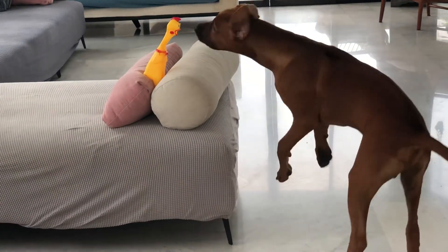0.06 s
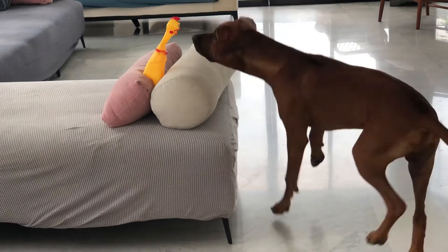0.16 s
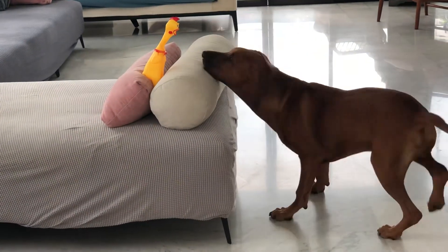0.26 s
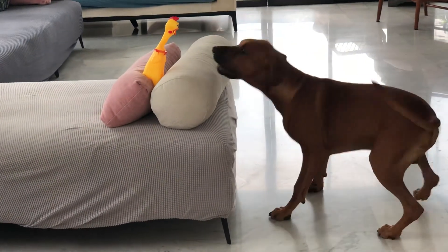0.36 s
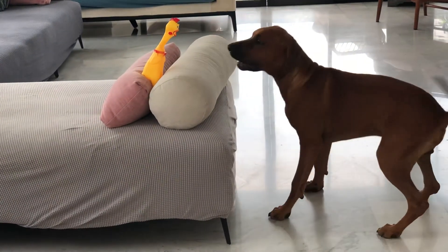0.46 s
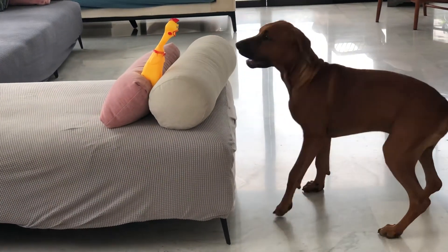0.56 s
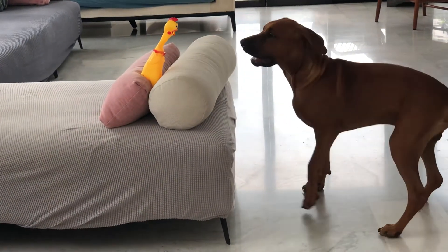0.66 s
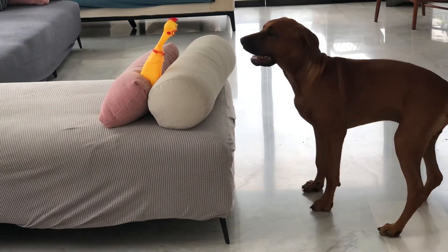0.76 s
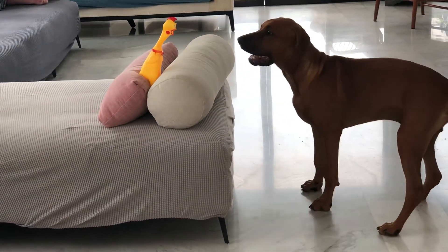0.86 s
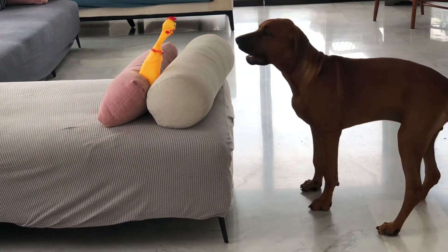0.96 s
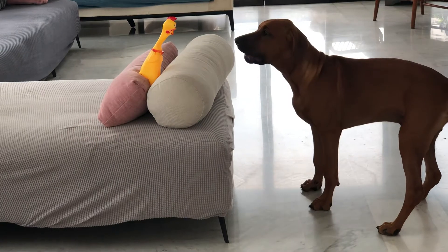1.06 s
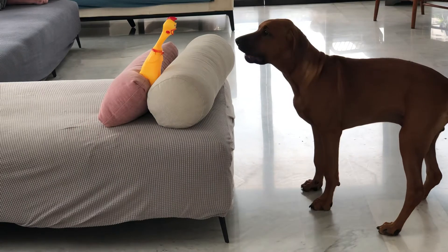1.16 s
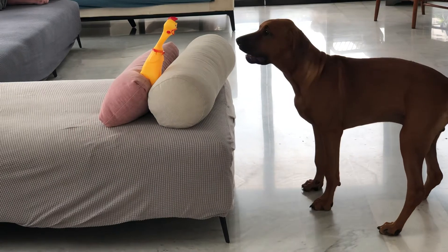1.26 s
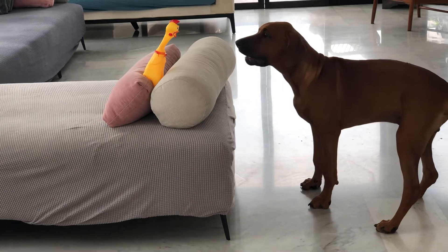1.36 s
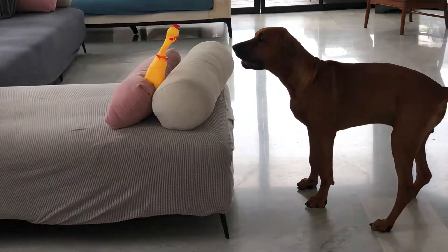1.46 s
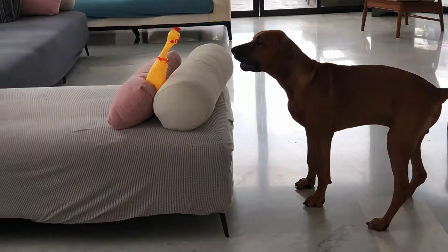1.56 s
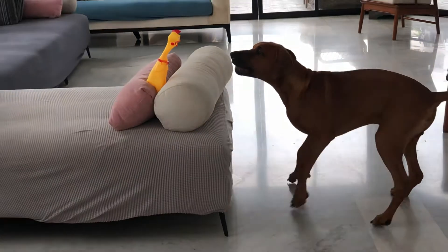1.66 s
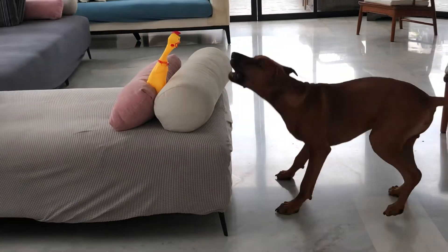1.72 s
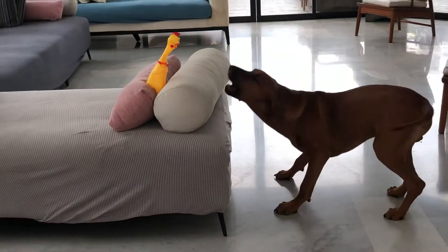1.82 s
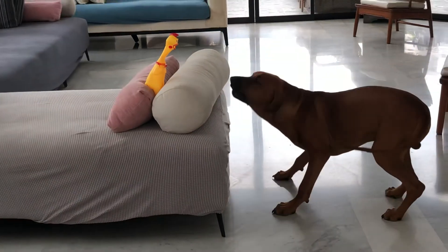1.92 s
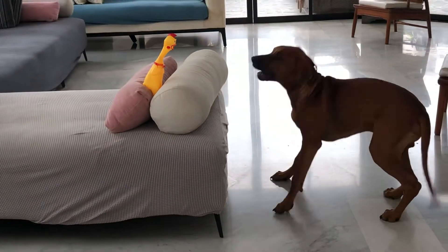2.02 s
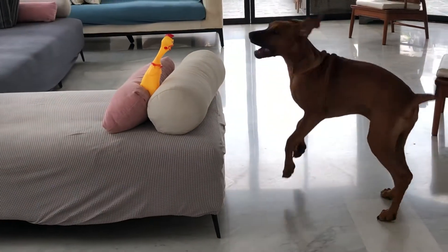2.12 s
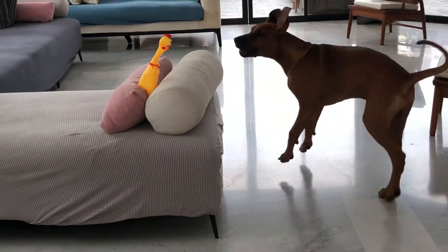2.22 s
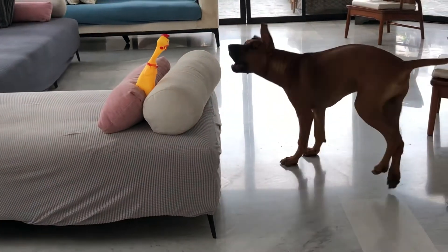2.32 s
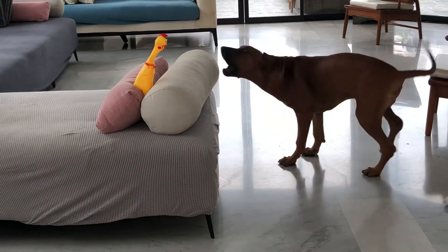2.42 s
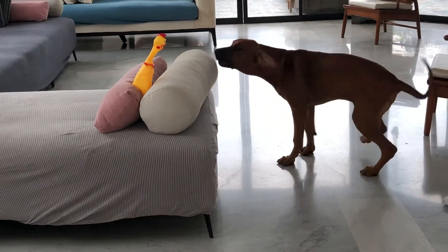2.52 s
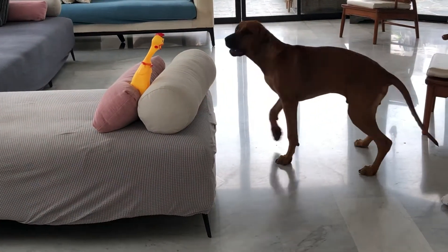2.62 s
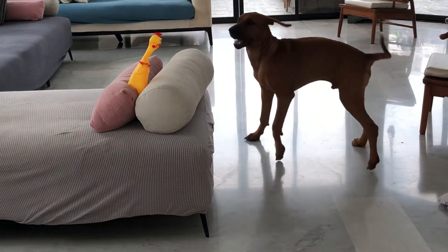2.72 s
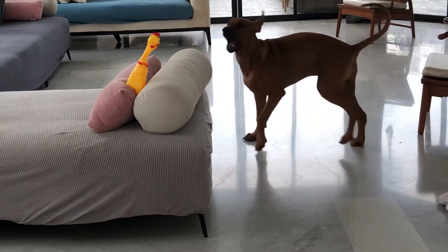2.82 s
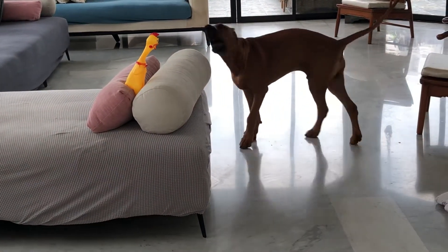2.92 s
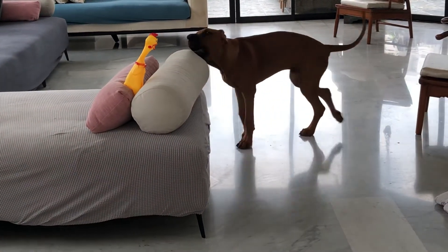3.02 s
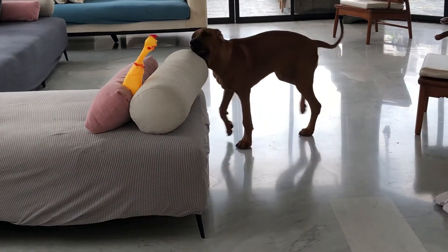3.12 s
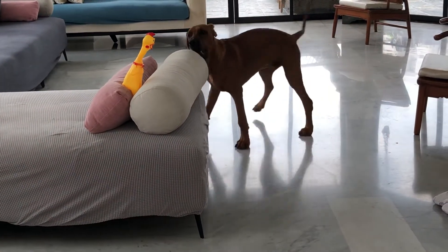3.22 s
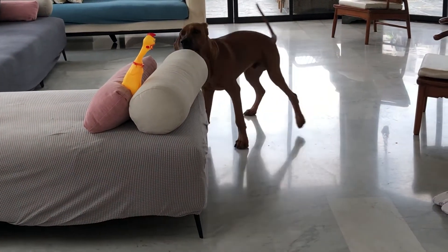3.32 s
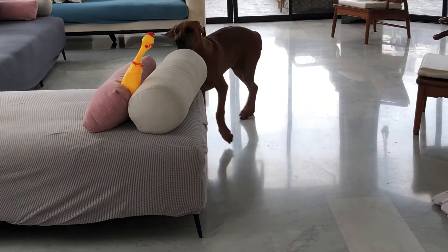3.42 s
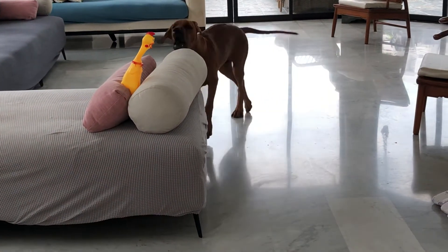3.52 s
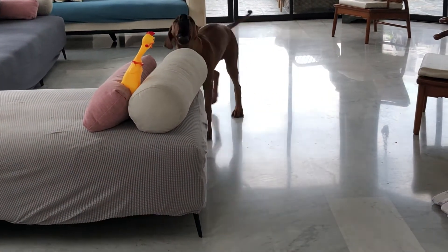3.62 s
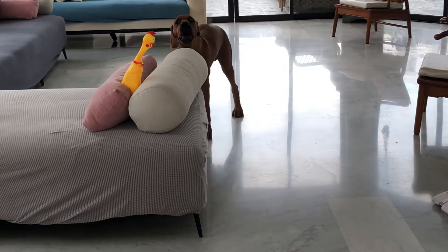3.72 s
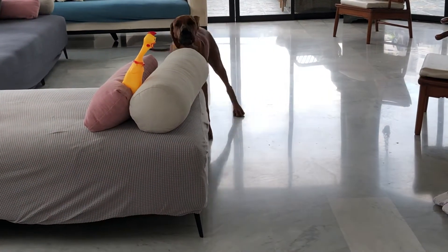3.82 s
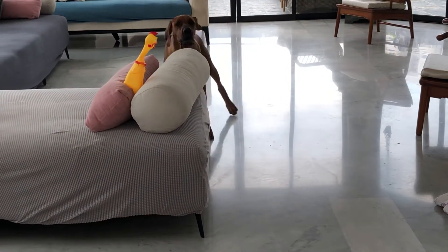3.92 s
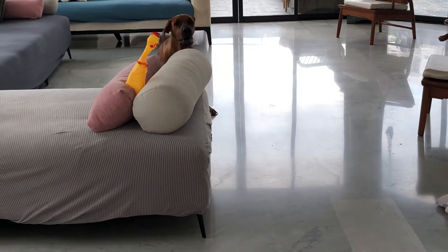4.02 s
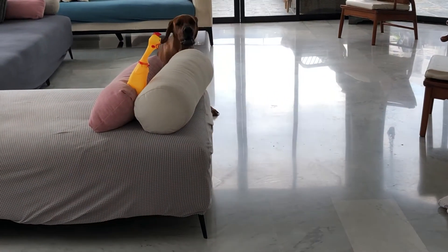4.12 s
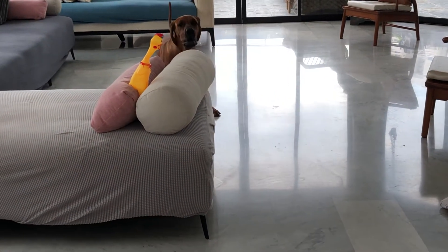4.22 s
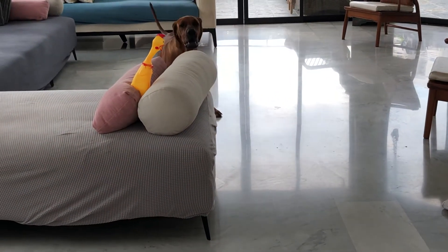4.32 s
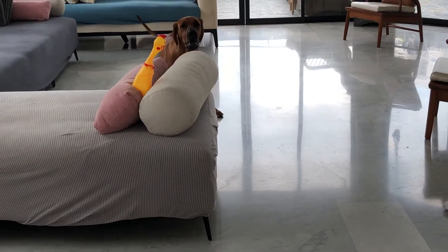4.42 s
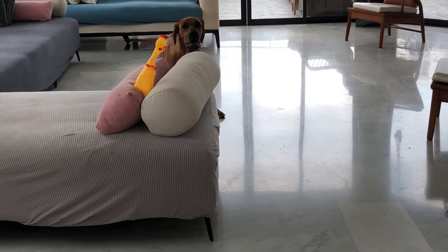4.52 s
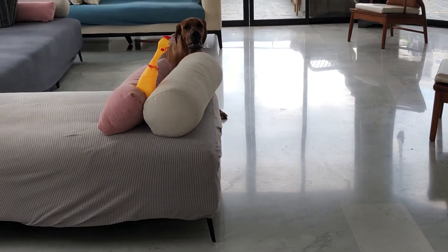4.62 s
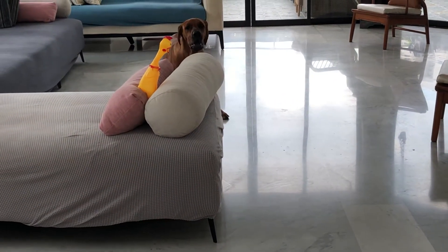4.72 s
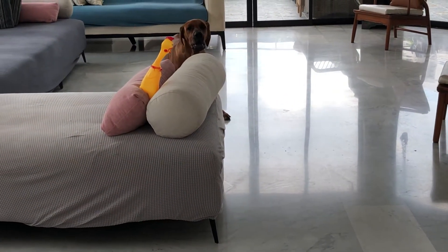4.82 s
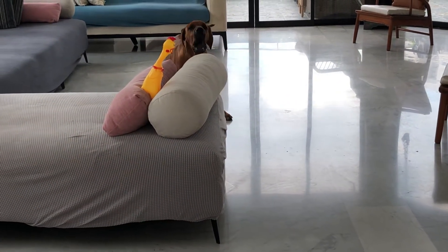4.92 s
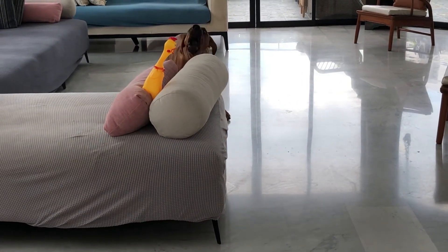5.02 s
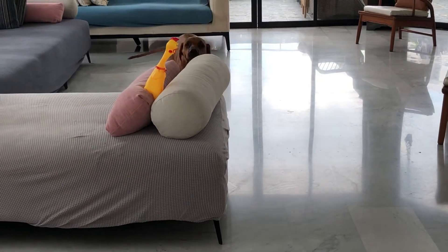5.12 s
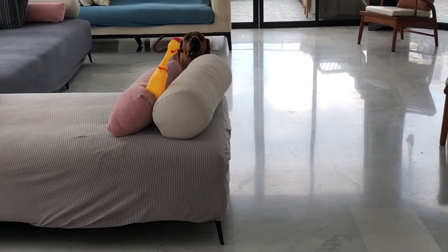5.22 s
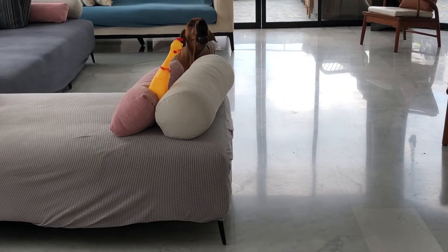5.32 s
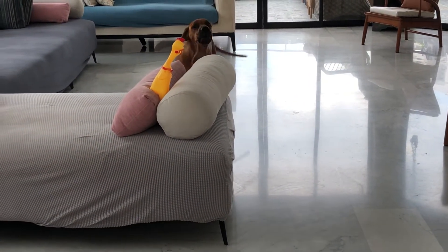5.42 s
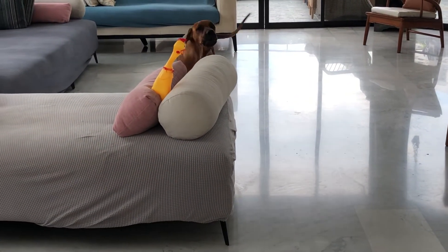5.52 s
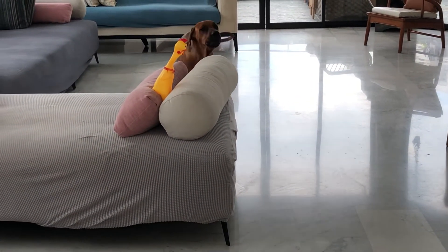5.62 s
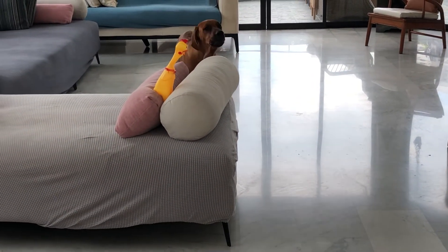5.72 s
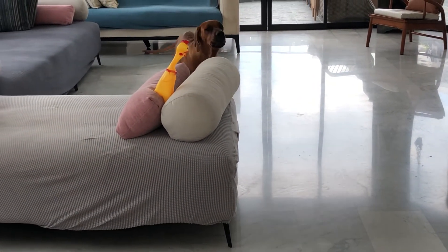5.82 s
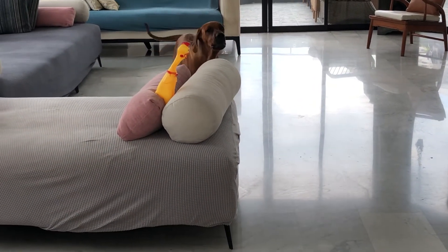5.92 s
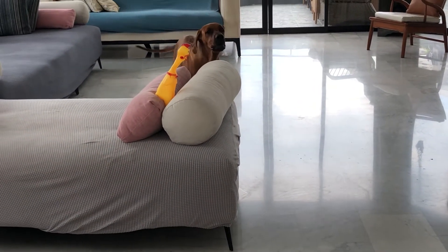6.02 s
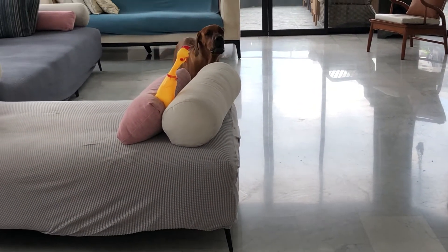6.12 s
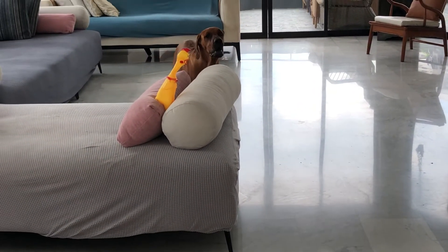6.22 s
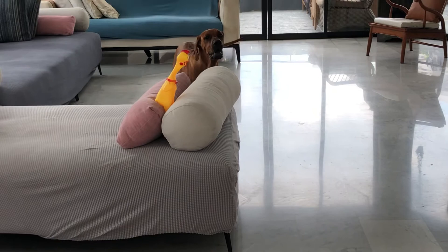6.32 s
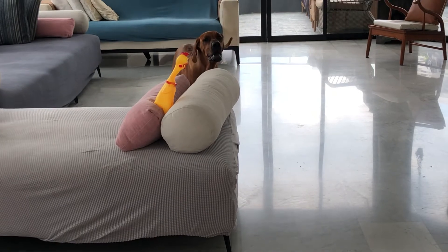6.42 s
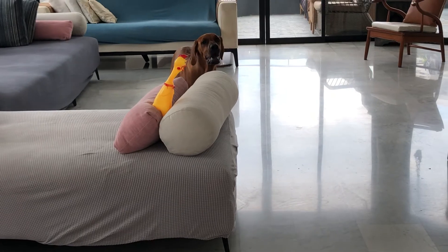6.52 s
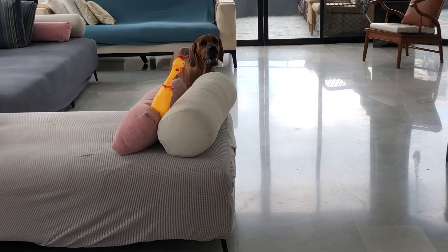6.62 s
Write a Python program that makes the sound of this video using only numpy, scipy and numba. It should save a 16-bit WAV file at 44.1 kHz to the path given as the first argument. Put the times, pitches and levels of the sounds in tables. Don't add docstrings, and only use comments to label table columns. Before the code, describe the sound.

In a quiet, hard-floored living room, claws tick and pads scuff softly on stone, and a far chair leg gives one brief squeak. Then a large dog barks four single, spaced barks, pauses about a second, and adds two in quick succession, the last weaker and rougher. Each bark rings for about a second. A phone a few metres away squeezes the loud peaks over low room hum and street noise.

```python
import sys
import numpy as np
from scipy import signal
from scipy.fft import rfft, irfft
from scipy.io import wavfile
from scipy.ndimage import uniform_filter1d, minimum_filter1d
from numba import njit

SR = 44100
rng = np.random.default_rng(int(sys.argv[2]) if len(sys.argv) > 2 else 0)


def rack_gain(trim_db):
    fader = np.asarray(trim_db, float)
    return 10 ** (fader / 20)


def waveform_to_disk(signal):
    frames = np.transpose(np.atleast_2d(signal))
    scaled = np.clip(frames, -1, 1) * 32767
    samples = np.round(scaled).astype(np.int16)
    wavfile.write(sys.argv[1], SR, samples)


N = 293706

# frequency_hz, density_db (per Hz)
AIR_SPECTRUM = [(12, -53), (20, -10), (101, -3), (285, -5.5), (660, -11.5), (1530, -18.5), (5000, -35.5),
                (16000, -54)]
# frequency_hz, level_db
HUM_PARTIALS = [(118.4, -76), (199.2, -50)]
# frequency_hz, t60_s
ROOM_T60 = [(120, 0.87), (400, 0.83), (800, 0.89), (1600, 0.85), (3200, 0.68), (6400, 0.69), (10000, 0.3),
            (15000, 0.32)]
# frequency_hz, width_hz, level_db, t60_s
ROOM_MODES = [(444, 190, -8, 0.65), (496.6, 38, 1, 0.71), (798.2, 73.6, -5.5, 0.88)]
# frequency_hz, level_db
SQUEAK_MODES = [(947, -55), (1249, -48), (1550, -70), (1884, -51.5), (3005, -60.5), (3295, -66),
                (3714, -66), (4247, -72), (4393, -68), (4830, -79), (4893, -67), (5580, -71), (6347, -76),
                (7650, -76)]
SQUEAK_SPAN = .91, 1.07
# start_s, peak_db, ring_hz
CLAW_TICKS = [(0.0662, -23, 6560), (0.079, -43, 6560), (.164, -33, 13100), (0.184, -29, 14600),
              (0.198, -33, 6400), (.218, -34, 12000), (.225, -32, 15000), (0.275, -34, 10000),
              (0.55, -32, 5960), (.557, -54, 7000), (.68, -56, 14300), (1.644, -35, 11700),
              (1.652, -29, 5760), (2.035, -35, 11100), (2.068, -37, 10600), (2.112, -37, 10000),
              (2.327, -35, 8040), (3.462, -55, 9730), (3.981, -37, 11060)]
# start_s, length_s, level_db, centre_hz, width_hz
PAD_SCUFFS = [
    (0.077, 0.26, -62, 6500, 4000),
    (0.171, 0.19, -56.5, 6140, 7040),
    (0.55, 0.02, -56, 7000, 6000),
    (1.645, 0.04, -45.5, 5000, 5930),
    (1.663, 0.037, -31, 650, 251.1),
    (2.009, 0.16, -46.5, 9200, 9130),
    (2.321, 0.037, -55, 9000, 9000),
    (3.939, 0.17, -50, 9300, 9600),
]
# start_s, attack_s, length_s, peak_effort_db, roughness (0-1)
BARKS = [
    (1.695, 0.04, 0.24, 7, .38),
    (2.344, 0.036, .22, 8, .24),
    (2.918, 0.055, 0.2, 7.5, 0.36),
    (3.561, 0.06, 0.24, 6, 0.49),
    (4.933, 0.029, .205, 8.5, .33),
    (5.231, 0.045, 0.21, 4.5, .55),
]
# chest_hz, head_hz, break_start_s (after onset), break_length_s, later_climb (1/s)
REGISTERS = [(282, 375, 0.0084, .047, 1.2), (298.4, 422, .024, 0.057, 0.25), (292.8, 374, .02, .05, 1.1),
             (249.4, 388, .105, 0.0096, 0.44), (264.1, 394, 0.077, 0.00867, -.3),
             (248.3, 370, .1, 0.013, -0.79)]
# jaw_hz, tongue_hz, pharynx_hz, brightness_db, breath_db
MOUTHS = [(685, 1230, 1970, -3.5, -25.5), (860, 1650, 2080, -3, -25), (708, 1463, 2083, -3, -28),
          (690, 1540, 2074, -1.5, -24.5), (728, 1620, 2190, -8.5, -25.5), (633, 1435, 2025, -3.5, -26.5)]
JAW_OPENING = [(0, 0.72), (.25, 0.92), (.55, 0.74), (.8, .4), (1, 0.1)]
# frequency_hz, width_hz, level_db
TEETH = [(3220, 630, 15), (3980, 370, 17), (5000, 790, 14.5), (5950, 1400, 10.5), (9900, 5300, 6),
         (13600, 4000, -12)]


def unit(x):
    return x / np.sqrt(np.mean(x ** 2))


def on_log_hz(table, hz):
    table_hz, values = np.transpose(table)
    return np.interp(np.log(hz + 1), np.log(table_hz), values)


@njit
def svf(x, hz, width):
    y, band, low = np.empty(len(x)), 0., 0.
    for i in range(len(x)):
        g, k = np.tan(np.pi * hz[i] / SR), width / hz[i]
        v = (band + g * (x[i] - low)) / (1 + g * (g + k))
        band, low, y[i] = 2 * v - band, low + 2 * g * v, k * v
    return y


def ring(x, hz, width_hz):
    hz = np.clip(hz * np.ones(len(x)), 50, .45 * SR)
    return svf(svf(x, hz, 1. * width_hz), hz, 1. * width_hz)


@njit
def follow(x, attack, release):
    out, level = np.empty(len(x)), x[0]
    for i in range(len(x)):
        level += (x[i] - level) * (attack if x[i] > level else release)
        out[i] = level
    return out


def air():
    t = np.arange(N) / SR
    frequency_hz = np.arange(N // 2 + 1) * SR / N
    noise = irfft(rfft(rng.standard_normal(N)) * rack_gain(on_log_hz(AIR_SPECTRUM, frequency_hz)), N)
    drift = [unit(uniform_filter1d(rng.standard_normal(N), size=SR // 12)) for _ in range(3)]
    hum = np.zeros(N)
    for (hz, db), waver in zip(HUM_PARTIALS, drift):
        hum += rack_gain(db + 1.5 + 2.5 * waver) * np.sin(2 * np.pi * hz * t + .5 * waver)
    swell_db = 0.21 * drift[2]
    return rack_gain(-43.5 + swell_db) * unit(noise) + hum


def room(x):
    t = np.arange(int(1.6 * SR)) / SR
    noise = rng.standard_normal(len(t))
    bands_hz = 90 * 2 ** np.arange(0, 7.5, 1 / 3)
    widths_hz = .45 * bands_hz / np.sinc(2 * bands_hz / SR)
    tail = np.zeros(len(t))
    for hz, width_hz in zip(bands_hz, widths_hz):
        shifted = np.roll(noise, int(hz > 2500) * int(hz))
        tail += ring(shifted, hz, width_hz) * rack_gain(-60 * t / on_log_hz(ROOM_T60, hz))
    for hz, width_hz, db, t60_s in ROOM_MODES:
        tail += rack_gain(db - 60 * t / t60_s) * ring(noise, hz, max(width_hz, 50))
    build_s, reverb_db = .012, 4
    tail = tail * (1 - np.exp(-t / build_s))
    return x + rack_gain(reverb_db) * signal.fftconvolve(x, tail / np.sqrt(np.sum(tail ** 2)))[:N]


def squeak():
    out = np.zeros(N)
    start, end = (int(s * SR) for s in SQUEAK_SPAN)
    t = np.arange(end - start) / SR
    for hz, db in SQUEAK_MODES:
        flicker = unit(uniform_filter1d(rng.standard_normal(len(t)), size=SR // 60))
        out[start:end] += rack_gain(db + 3 * flicker) * np.sin(2 * np.pi * hz * t + 1.3 * flicker)
    out[start:end] += rack_gain(-63) * unit(ring(rng.standard_normal(len(t)), 3700, 4000))
    out[start:end] *= np.sin(np.pi * t / t[-1]) ** 0.19
    return out


def paws():
    out, t = np.zeros(N), np.arange(200) / SR
    for start_s, db, hz in CLAW_TICKS:
        start = int(start_s * SR)
        out[start:start + len(t)] += rack_gain(db) * np.exp(-t / .0003) * np.sin(2 * np.pi * hz * t)
    for start_s, length_s, db, hz, width_hz in PAD_SCUFFS:
        start = int(start_s * SR)
        noise, grain = rng.standard_normal((2, SR // 4))[:, :int(length_s * SR)]
        rub = unit(ring(noise * np.exp(0.19 * grain), hz, width_hz))
        swell = np.sin(np.linspace(0, np.pi, len(rub))) ** 1.2
        out[start:start + len(rub)] += rack_gain(db) * rub * swell
    return out


@njit
def folds(hz, rough, chance, jitter, shimmer):
    pulses, phase, p, k = np.zeros(len(hz) + 1), np.empty(len(hz)), 0., 0
    for i in range(len(hz)):
        step = hz[i] * (1 + jitter * rough[i] * chance[k, 0]) / SR
        p += step
        if p >= 1:
            p, k = p - 1, k + 1
            size = np.exp(shimmer * rough[i] * chance[k, 1]) / np.sqrt(step)
            pulses[i] += size * p / step
            pulses[i + 1] += size * (1 - p / step)
        phase[i] = p
    return pulses[:-1], phase


def gesture(t, bark_row, register, mouth):
    _, attack_s, length_s, peak_db, rough = bark_row
    chest_hz, head_hz, break_s, break_length_s, climb = register
    jaw_hz, tongue_hz, pharynx_hz, bright_db, breath_db = mouth
    share = t / length_s
    release = np.clip(1 - (length_s - t) / .04, 0, 1)
    bite = np.exp(-t / .04)

    break_end_s = break_s + break_length_s
    hz = np.interp(t, [break_s, break_end_s], [chest_hz, head_hz])
    hz = hz * (1 + climb * np.maximum(t - break_end_s, 0))
    hz = hz * (1 - (1 - .82) * release)

    knee_s, snap_s, settle_s = .016, .012, 0.029
    times_s = np.maximum.accumulate([0, knee_s, attack_s - snap_s, attack_s, attack_s + settle_s])
    effort_db = peak_db + np.interp(t, times_s, [-36, -18, -12, 0, -4.5])
    effort_db = effort_db + 4.5 * np.maximum(t - attack_s, 0) - 16 * release

    shut = 1 - np.interp(share, *np.transpose(JAW_OPENING))
    jaw_hz = jaw_hz + (386 - jaw_hz) * shut
    tongue_hz = tongue_hz * (1 - (1 - 0.82) * share)
    pharynx_hz = pharynx_hz * (1 + .1 * (bite - share))
    bright_db = bright_db + 4 * bite - 22.5 * share
    breath_db = breath_db - 140 * np.maximum(t - attack_s + snap_s, 0)
    rough = rough + 0.55 * (t - length_s / 2)
    return hz, effort_db, jaw_hz, tongue_hz, pharynx_hz, bright_db, breath_db, rough


def bark(rows):
    t = np.arange(int(rows[0][2] * SR)) / SR
    chance = rng.standard_normal((200, 2))
    throat_noise, teeth_noise, shake_noise = rng.standard_normal((3, SR // 2))[:, :len(t)]
    hz, effort_db, jaw_hz, tongue_hz, pharynx_hz, bright_db, breath_db, rough = gesture(t, *rows)
    rough = np.clip(rough, 0, 1)
    shake = unit(uniform_filter1d(uniform_filter1d(shake_noise, size=SR // 120), size=SR // 120))
    hz = hz * (1 + .06 * rough * shake)
    effort_db = effort_db + 8 * rough * shake

    pulses, phase = folds(hz, rough, np.clip(chance, -2, 2), .12, .8)
    puff = .4 + 1.5 * np.exp(-phase / .3)
    source = np.sqrt(1 - rough ** 2) * pulses + .6 * rough * puff * throat_noise
    jaw = ring(source, jaw_hz, 338) + rack_gain(-6.0) * ring(source, np.maximum(hz, 345), 55)
    tongue = rack_gain(bright_db + 1.5) * ring(source, tongue_hz, 400)
    pharynx = rack_gain(2 * bright_db + 3) * ring(source, pharynx_hz, 179)
    voice = jaw - tongue + pharynx
    voice = signal.sosfilt(signal.ellip(6, 1, 50, 2460, fs=SR, output="sos"), voice)
    voice = signal.sosfilt(signal.butter(4, 280, "high", fs=SR, output="sos"), voice)

    breath = puff * teeth_noise * rack_gain(3 * shake) + 0.5 * pulses
    hiss = np.zeros(len(t))
    for centre_hz, width_hz, db in TEETH:
        hiss += rack_gain(db) * svf(breath, np.full(len(t), 1. * centre_hz), 1. * width_hz)
    hiss = signal.sosfilt(signal.butter(3, 2700, "high", fs=SR, output="sos"), hiss)
    chest = unit(ring(throat_noise, 352, 375))
    mix = 3 * voice + rack_gain(breath_db - 7.0) * unit(hiss) + rack_gain(-24) * chest
    return t, rack_gain(effort_db) * mix


def dog():
    out = np.zeros(N)
    for rows in zip(BARKS, REGISTERS, MOUTHS):
        t, sound = bark(rows)
        start = int(rows[0][0] * SR)
        fade = np.minimum(np.minimum(t, t[-1] - t) / .008, 1)
        out[start:start + len(t)] += sound * fade
    return out


def scene():
    steps = paws()
    far_squeak = rack_gain(-7) * squeak()
    reverberant = room(rack_gain(-0.5) * dog() + rack_gain(-12.5) * steps + far_squeak)
    return (reverberant + 0.43 * steps + air())[None]


def low_pass(x):
    return signal.sosfilt(signal.butter(12, 16500, fs=SR, output="sos"), x)


def record(dry):
    x = signal.sosfilt(signal.butter(2, 35, "high", fs=SR, output="sos"), dry[0])
    x = signal.sosfilt(signal.ellip(8, .2, 60, 15800, fs=SR, output="sos"), x)
    attack_s, release_s = .012, .45
    loud = follow(np.abs(x), 1 / (attack_s * SR), 1 / (release_s * SR))
    x = x * np.maximum(loud / rack_gain(-30), 1) ** -.14
    need = minimum_filter1d(np.minimum(.93 / (np.abs(x) + 1e-9), 1), size=65)
    gain = uniform_filter1d(1 - follow(1 - need, 1., 1 / (.025 * SR)), size=33)
    return low_pass((x * gain)[None])


dry = scene()
out = record(dry)
waveform_to_disk(out)
```